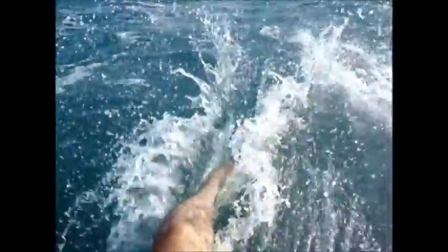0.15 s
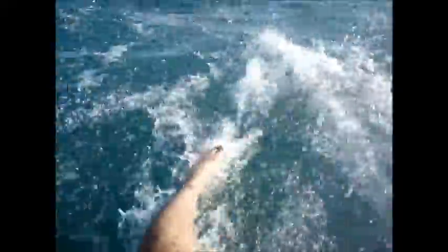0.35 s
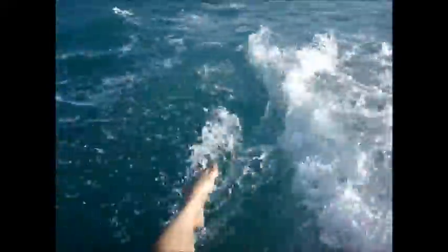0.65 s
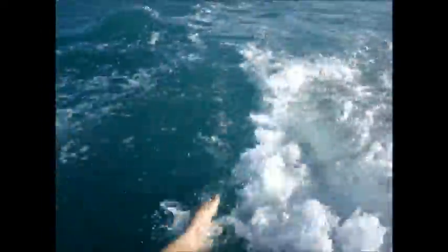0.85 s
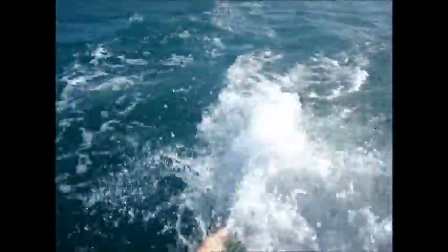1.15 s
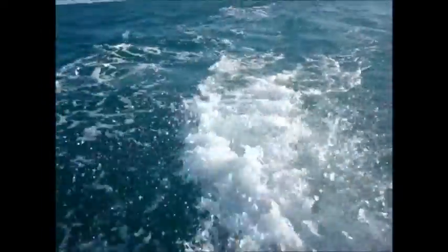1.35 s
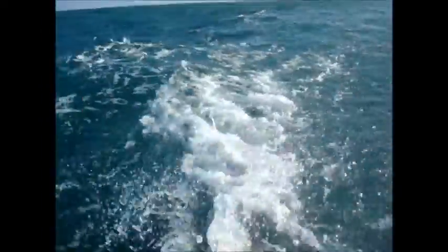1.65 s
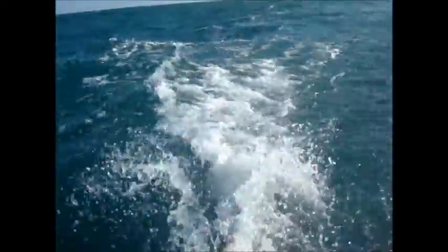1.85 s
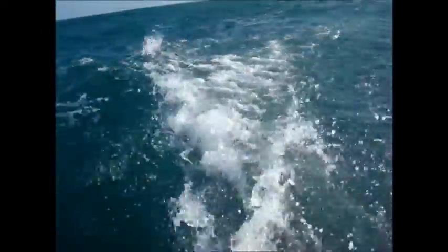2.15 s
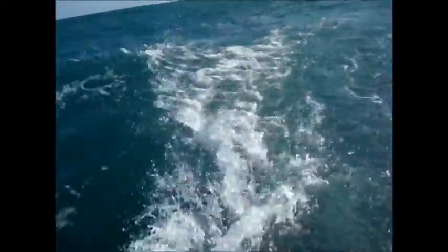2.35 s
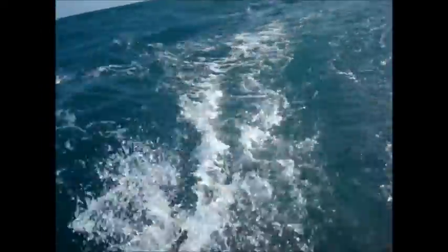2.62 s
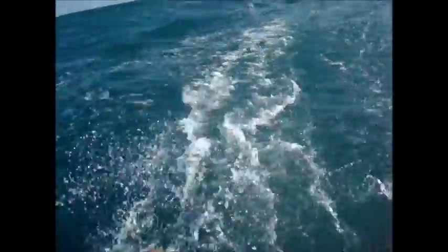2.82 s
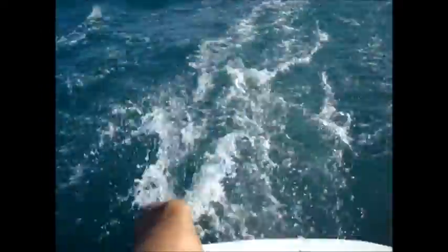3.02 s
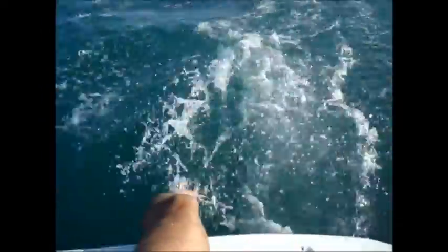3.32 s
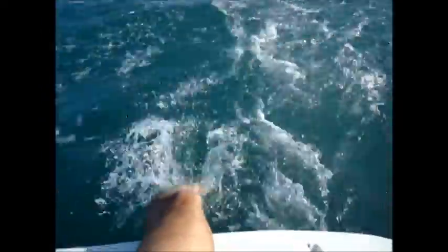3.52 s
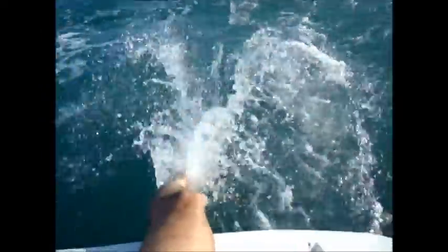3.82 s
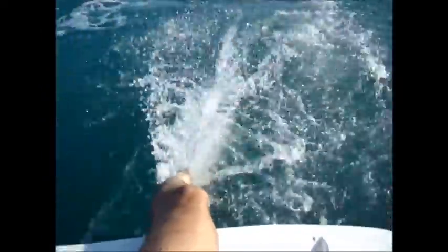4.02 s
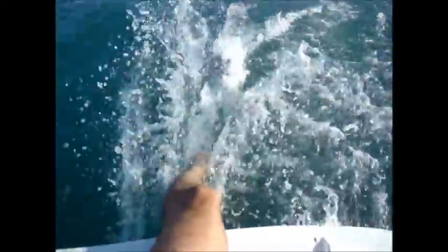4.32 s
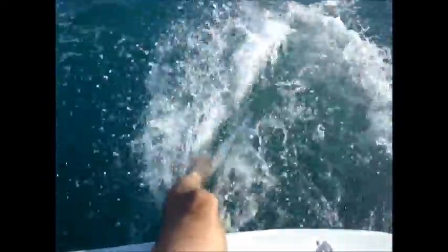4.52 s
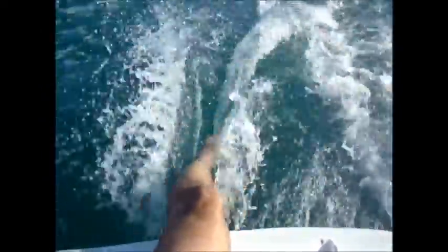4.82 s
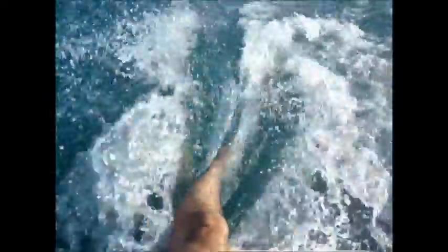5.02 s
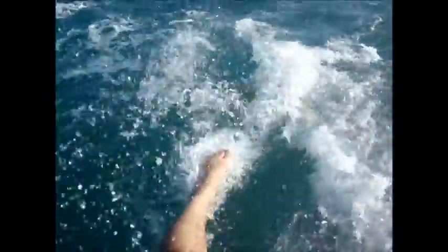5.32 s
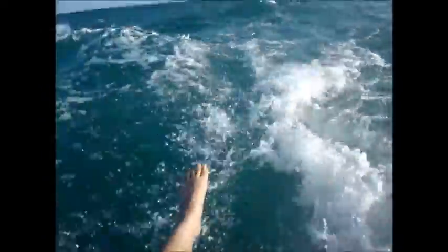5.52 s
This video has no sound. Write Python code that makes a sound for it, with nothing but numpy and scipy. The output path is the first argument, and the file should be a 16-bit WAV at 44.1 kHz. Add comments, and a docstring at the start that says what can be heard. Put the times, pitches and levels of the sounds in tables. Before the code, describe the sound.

A fast boat's wake hisses, gurgles and splashes around a trailing foot, repeatedly interrupted by hard, low wind buffets that make the sound duck.

```python
"""Water rushes and bubbles past a fast boat on open sea while a passenger trails a foot beside the hull.
The wake is noise and ringing bubbles that follow one loudness curve. Short bursts of noise are slaps of
water, and quickly fading tones with a slightly rising pitch are single large bubbles. Wind rumbles, flutters
and thumps as low noise on a small microphone, whose gain control turns all the sound down when it is loud."""
import sys
import numpy as np
from scipy import signal
from scipy.io import wavfile
from scipy.ndimage import uniform_filter1d

SR = 44100
rng = np.random.default_rng(int(sys.argv[2]) if len(sys.argv) > 2 else 0)


def to_wav(sig):
    """Store sig (one row per channel, or 1-D mono) as 16-bit WAV at the path in sys.argv[1].

    Samples outside -1..1 are clipped; the rate is SR.
    """
    pcm = np.clip(np.atleast_2d(sig), -1, 1) * 32767
    pcm = np.round(pcm).astype(np.int16)
    wavfile.write(sys.argv[1], SR, pcm.T)  # frames by channels


N = 249587

# gusts that flutter on the microphone, before the lift and bass loss in wind():
# (time [s], level [dB], length [s])
GUSTS = [(0.025, -21.5, 0.05), (0.215, -23.5, .035), (0.385, -25, 0.059), (0.665, -16, 0.048),
         (0.92, -19.5, 0.088), (1.731, -23, 0.06), (1.906, -4.5, 0.022), (2.195, -19.5, .09),
         (2.404, -21.5, 0.055), (2.669, -13.5, 0.029), (2.722, -21, 0.038), (3.21, -17, .045),
         (3.314, -3, 0.042), (3.413, 2, 0.021), (3.53, -13.5, 0.02), (3.577, -23.5, 0.017),
         (4.351, -13, 0.025), (5.01, -23.5, 0.058), (5.077, -9, 0.013), (5.159, -15.5, 0.028),
         (5.473, -16.5, 0.012), (5.531, -13.5, 0.011)]
TYPICAL_GUST_DB = -14
USUAL_WATER_DB = -23.5  # usual level of the water sound, told by its foam


def from_db(db):
    """Turn decibels into a factor for the amplitude."""
    return 10 ** (np.asarray(db) / 20)


def rms_one(x):
    """Scale a sound so that its rms (its average strength) is 1."""
    return x / np.sqrt(np.mean(x ** 2) + 1e-20)


def at_hz(spectrum, hz):
    """Read a spectrum between its points, with pitch on a log scale."""
    point_hz, point_db = np.transpose(spectrum)
    return np.interp(np.log(hz), np.log(point_hz), point_db)


def butter(x, hz, kind, order=2):
    """Filter a sound by pitch: keep the low, the high or a band of it."""
    safe_hz = np.clip(hz, 10, .45 * SR)
    return signal.sosfilt(signal.butter(order, safe_hz, kind, fs=SR, output="sos"), x)


def drift(rate_hz):
    """Wander at random about zero with rms 1; a higher rate wanders faster."""
    step, warm_up = 40, 2000  # samples per slow point; slow points dropped while the filter settles
    r = np.exp(-2 * np.pi * step * rate_hz / SR)
    noise = rng.standard_normal(N // step + warm_up + 2)
    slow = signal.lfilter([1], [1, -2 * r, r * r], noise)[warm_up:]
    return np.interp(np.arange(N) / step, np.arange(len(slow)), rms_one(slow))


def turbulence(spectrum, surge_db, surge_rate, patchy_db, patchy_rate):
    """Rough air or water: noise in 16 narrow bands that surge together and flicker each alone; rms 1."""
    edges = np.geomspace(spectrum[0][0], spectrum[-1][0], 17)
    white = rng.standard_normal((2, N))
    out = 0
    for k, (low, high) in enumerate(zip(edges, edges[1:])):
        band_db = at_hz(spectrum, np.sqrt(low * high)) + patchy_db * drift(patchy_rate)
        # neighbouring bands take turns between two noises
        out = out + from_db(band_db) * butter(white[k % 2], [low, high], "band")
    return rms_one(out * from_db(surge_db * drift(surge_rate)))


def bubbles(spectrum, low_hz, high_hz, per_s, cycles, size_db, clump_db, count=48):
    """Bubbles of random size are born in clumps; each rings at one of many pitches, down 60 dB in
    the given number of cycles; rms 1."""
    chance = per_s * from_db(clump_db * drift(15)) / SR
    born = np.flatnonzero(rng.random(N) < chance)
    size = from_db(size_db * np.minimum(rng.exponential(1, N), 4)) * rng.choice([-1, 1], N)
    pitch_number = rng.integers(0, count, N)
    out = 0
    for k, hz in enumerate(np.geomspace(low_hz, min(high_hz, .45 * SR), count)):
        clicks = np.full(N, 1e-18)
        mine = born[pitch_number[born] == k]
        clicks[mine] = size[mine]
        r, w = from_db(-60 * hz / (cycles * SR)), 2 * np.pi * hz / SR
        ringing = signal.lfilter([1, 0, -1], [1, -2 * r * np.cos(w), r * r], clicks)
        # small bubbles die sooner and cover more Hz, so they need more height for the same spectrum
        out = out + hz * from_db(at_hz(spectrum, hz)) * ringing
    return rms_one(out)


def add_burst(out, s, level_db, length, noise):
    """Add a burst of noise, centred at s, with steep flanks and the given rms level at its top."""
    t = (np.arange(len(noise)) - len(noise) // 2) / SR
    bell = 1 / np.sqrt(1 + np.abs(2 * t / length) ** 5)
    shaped = bell * noise
    burst = shaped * np.sqrt(np.sum(bell ** 2) / np.sum(shaped ** 2))
    at = np.round((s + t) * SR).astype(int)
    inside = (at >= 0) & (at < N)
    out[at[inside]] += from_db(level_db) * burst[inside]


def water_loudness():
    """Level of the water sound, in dB above its usual level; it dips after the hardest gusts."""
    # level of the water sound, told by its foam: (time [s], level [dB])
    loudness_curve = [(0.0, -20), (0.28, -22.5), (0.57, -17), (0.8, -20), (1.5, -22.5), (1.87, -24.5),
                      (2.14, -32.5), (2.42, -23), (2.65, -24), (2.85, -29), (2.98, -23), (3.25, -28.5),
                      (3.65, -36), (4.09, -29.5), (4.22, -23.5), (4.65, -24), (4.9, -20), (5.66, -21.5)]
    s, level_db = np.transpose(loudness_curve)
    return np.interp(np.arange(N) / SR, s, level_db) - USUAL_WATER_DB


def rumble():
    """The airflow rumbles softly all the time and swells before and after each gust."""
    # spectrum of the rumble: (pitch [Hz], level [dB per Hz])
    rumble_spectrum = [(25, -25.5), (50, -16), (100, -6), (170, -1), (280, 1.5), (450, -0.5), (800, -28.5),
                       (1600, -50.5)]
    breeze_db, breeze_follows = -37, 0.49  # level at the usual water level; dB per dB of water level
    # level of the swell at a typical gust; dB per dB of gust; rise and fall time
    swell_db, swell_follows, swell_s = -30.5, 0.39, 0.1
    t = np.arange(N) / SR
    power = from_db(breeze_db + breeze_follows * water_loudness()) ** 2
    for s, level_db, _ in GUSTS:
        top_db = swell_db + swell_follows * (level_db - TYPICAL_GUST_DB)
        power = power + from_db(top_db) ** 2 * np.exp(-((t - s) / swell_s) ** 2)
    air = turbulence(rumble_spectrum, surge_db=2.5, surge_rate=56, patchy_db=2.0, patchy_rate=32)
    return np.sqrt(power) * air


def eddy(edge_hz, bass_cut_hz=190, bass_share=0.38, lump_db=2.5, lump_hz=110):
    """Half a second of swirling air that breaks into lumps of pressure; brighter swirls hold less bass."""
    lumps = from_db(lump_db * rms_one(butter(rng.standard_normal(SR // 2), lump_hz, "low")))
    swirl = butter(lumps * rng.standard_normal(SR // 2), edge_hz, "low", order=3)
    return butter(swirl, max(bass_cut_hz, bass_share * edge_hz), "high", order=1)


def wind(bass_loss_hz=145, lift_db=0.5):
    """Gusts and single thumps on top of the rumble; the small microphone loses their deep bass."""
    # single eddies that thump, before the lift and bass loss: (time [s], level [dB], upper edge [Hz])
    thumps = [(0.775, -4, 320), (0.795, -12, 470), (1.75, -17, 330), (1.883, -5, 490), (1.932, -7, 555),
              (2.166, -18, 500), (2.217, -14, 680), (2.248, -19, 290), (2.816, -11, 284), (2.955, -16, 260),
              (2.987, -13, 263), (3.239, -10, 660), (3.271, -6, 617), (3.45, -14, 600), (3.485, -13, 650),
              (4.421, -17.5, 290), (4.743, -12.5, 316), (5.053, -12, 850)]
    thump_s = 0.0087
    typical_edge_hz, db_per_octave = 523, 21  # harder gusts are brighter
    eddies = np.zeros(N)
    for s, level_db, length in GUSTS:
        edge_hz = typical_edge_hz * 2 ** ((level_db - TYPICAL_GUST_DB) / db_per_octave)
        add_burst(eddies, s, level_db + lift_db, length, eddy(edge_hz))
    for s, level_db, edge_hz in thumps:
        add_burst(eddies, s, level_db + lift_db, thump_s, eddy(edge_hz))
    return rumble() + butter(eddies, bass_loss_hz, "high")


def slaps(spread=1.17):
    """Each sheet of water that slaps down bursts into a short splash: noise round one pitch."""
    # sheets of water: (time [s], level [dB], length [s], centre [Hz])
    sheets = [(.168, -12.5, 0.004, 1240), (.172, -16, 0.0092, 4400), (1.407, -22, 0.017, 2100),
              (1.427, -26, 0.033, 5470), (4.169, -20.5, .0059, 2820), (4.479, -8.5, 0.0014, 3470),
              (4.818, -21, .0075, 1600), (5.088, -14.5, 0.0093, 1450)]
    out = np.zeros(N)
    for s, level_db, length, hz in sheets:
        splash = butter(rng.standard_normal(SR // 4), [hz / spread, hz * spread], "band")
        add_burst(out, s, level_db, length, splash)
    return out


def plips(cycles=32, rise=0.066):
    """A bubble rings down in a few dozen cycles, its pitch rising as it nears the surface."""
    # single large bubbles: (time [s], peak level [dB], starting pitch [Hz])
    large_bubbles = [(.608, -8, 860), (2.585, -15, 530), (3.708, -22, 2100), (4.186, -9, 1800),
                     (4.203, -10, 1080), (4.229, -7, 1400), (4.251, -9, 1830)]
    out, t = np.zeros(N), np.arange(SR // 10) / SR
    for s, peak_db, hz in large_bubbles:
        age = t * hz / cycles  # reaches 1 when the ring is 60 dB down
        ring = from_db(peak_db - 60 * age) * np.sin(2 * np.pi * hz * t * (1 + rise * age))
        at = round(s * SR)
        out[at:at + len(t)] += ring[:N - at]
    return out


def spray(water_db):
    """Fine spray hisses and patters: bright noise and many tiny, short rings."""
    # spectrum of the spray: (pitch [Hz], level [dB per Hz])
    spray_spectrum = [(1000, -11.5), (2200, 0.5), (3000, -3), (4000, -3), (5500, -8.5), (7500, -14.5),
                      (10000, -19)]
    usual_db, follows = -27, 0.68  # level at the usual water level; dB per dB of water level
    hiss = turbulence(spray_spectrum, surge_db=1.4, surge_rate=38, patchy_db=2.5, patchy_rate=43)
    patter = bubbles(spray_spectrum, 2580, 9230, per_s=3500, cycles=16, size_db=7.5, clump_db=1.5)
    mix = from_db(0.5) * hiss + from_db(-5.5) * patter
    return from_db(usual_db + follows * water_db) * mix


def foam(water_db):
    """Foam rushes and bubbles, following the water loudness curve dB for dB."""
    # spectrum of the foam: (pitch [Hz], level [dB per Hz])
    foam_spectrum = [(200, -23.5), (500, 1.5), (700, 1), (900, 5), (1600, 3.5), (2300, -5), (3500, -3),
                     (9000, -17.5)]
    rush = turbulence(foam_spectrum, surge_db=.6, surge_rate=20, patchy_db=1.3, patchy_rate=25)
    fizz = bubbles(foam_spectrum, 650, 3000, per_s=1000, cycles=38, size_db=3.3, clump_db=2.5)
    mix = from_db(-2.5) * rush + from_db(-1.5) * fizz
    return from_db(USUAL_WATER_DB + water_db) * mix


def churn(water_db):
    """Big air pockets churn by the hull: low noise and low bubble rings, with the widest level swings."""
    # spectrum of the churn: (pitch [Hz], level [dB per Hz])
    churn_spectrum = [(45, -21), (110, -26.5), (210, -16.5), (300, -1.5), (470, 3), (600, -1), (750, -19),
                      (1200, -38)]
    usual_db, follows = -27.5, 1.3  # level at the usual water level; dB per dB of water level
    surge = turbulence(churn_spectrum, surge_db=5.0, surge_rate=16.4, patchy_db=1.0, patchy_rate=23)
    pockets = bubbles(churn_spectrum, 253.5, 571, per_s=200, cycles=31, size_db=3.5, clump_db=2.5)
    mix = from_db(-6.5) * surge + from_db(-8.0) * pockets
    return from_db(usual_db + follows * water_db) * mix


def wake():
    """The rushing wake: spray, foam and churn all grow and fade with one loudness curve."""
    water_db = water_loudness()
    return spray(water_db) + foam(water_db) + churn(water_db)


def scene():
    """Wind and water at one microphone, alike in both channels."""
    return np.tile(wind() + slaps() + plips() + wake(), (2, 1))


def gain_control(x, threshold_db=-15, slope=0.53, release_db_per_s=85):
    """The gain drops quickly when the level passes the threshold and climbs back steadily."""
    power = uniform_filter1d(x[0] ** 2, round(.012 * SR))
    level_db = 10 * np.log10(np.maximum(power, 1e-12))
    wanted_cut_db = slope * np.maximum(level_db - threshold_db, 0)
    # the cut jumps up at once, then shrinks at the release speed
    ramp = release_db_per_s * np.arange(N) / SR
    held_cut_db = np.maximum.accumulate(wanted_cut_db + ramp) - ramp
    # a 9 ms smoothing delays the cut, so the front of a gust gets through
    r = np.exp(-1 / (.009 * SR))
    cut_db = signal.lfilter([1 - r], [1, -r], held_cut_db)
    return x * from_db(-cut_db)


def record(dry, low_cut_hz=45, ceiling=.97, top_hz=10150):
    """Gain control, a gentle low cut, rounded peaks and a steep cut of the top."""
    leveled = butter(gain_control(dry), low_cut_hz, "high", order=1)
    rounded = ceiling * np.tanh(leveled / ceiling)
    return signal.sosfilt(signal.ellip(12, .1, 90, top_hz, fs=SR, output="sos"), rounded)


dry = scene()
out = record(dry)
to_wav(out)
```